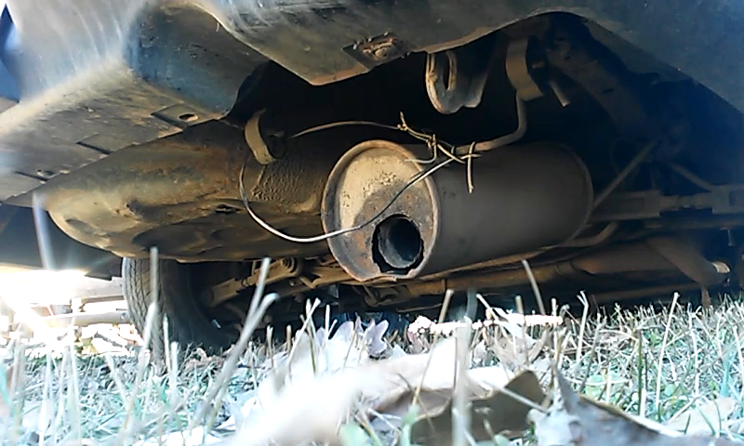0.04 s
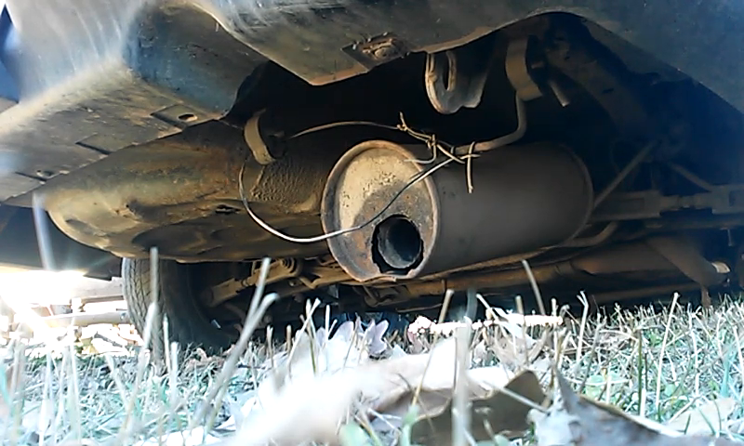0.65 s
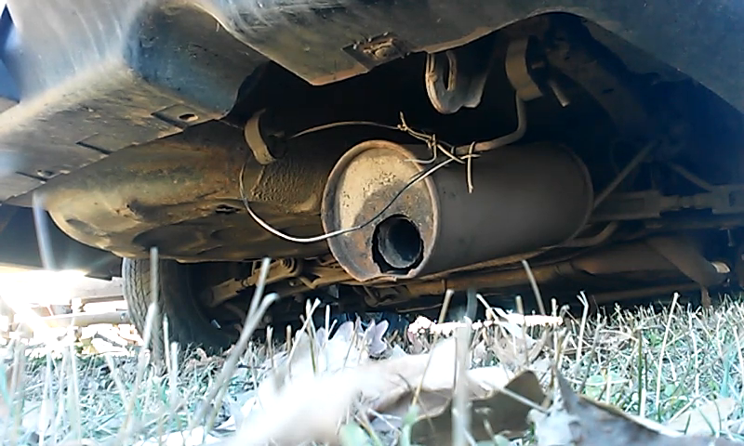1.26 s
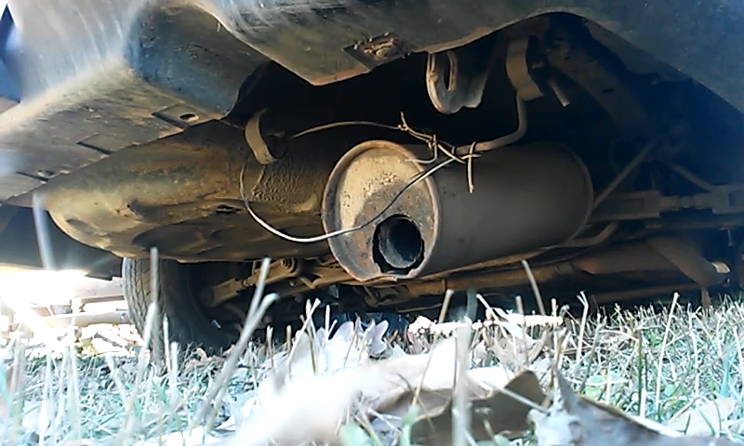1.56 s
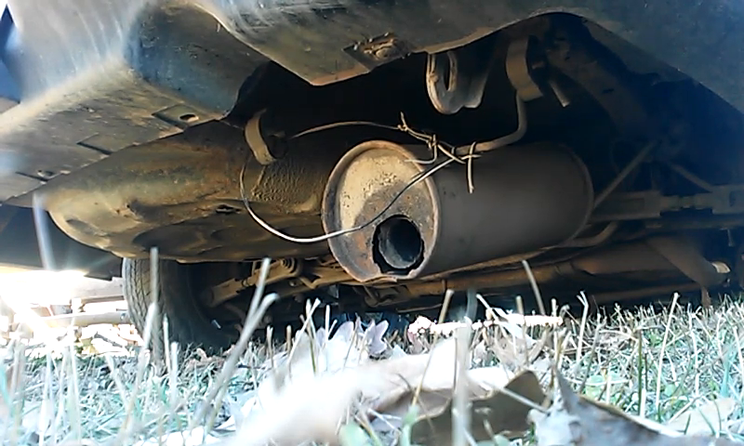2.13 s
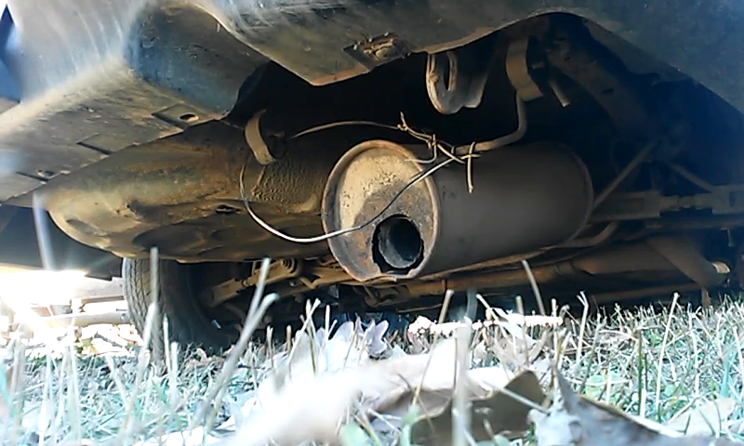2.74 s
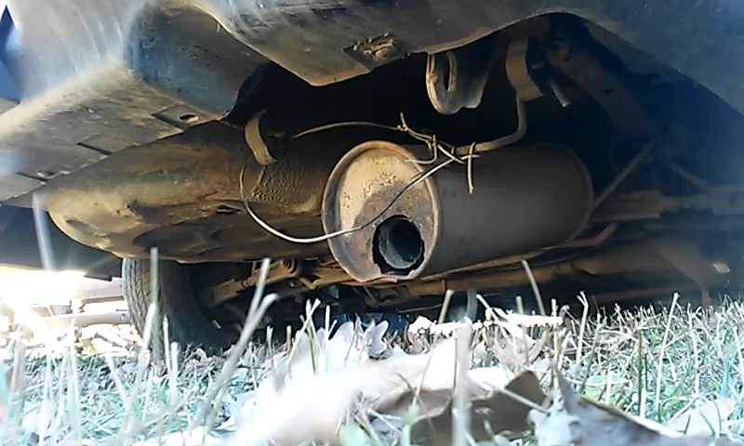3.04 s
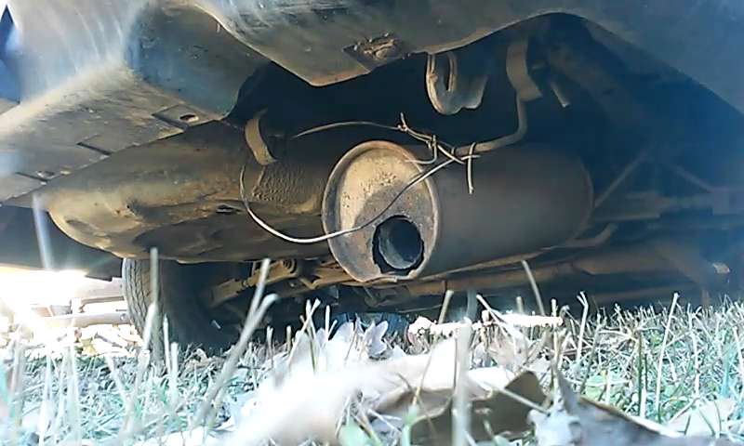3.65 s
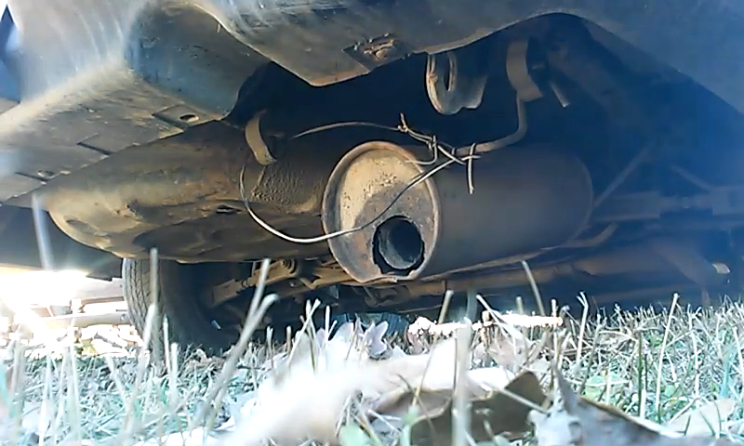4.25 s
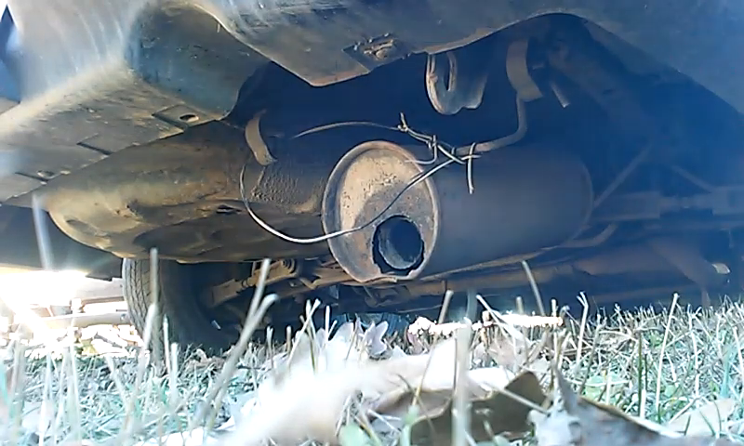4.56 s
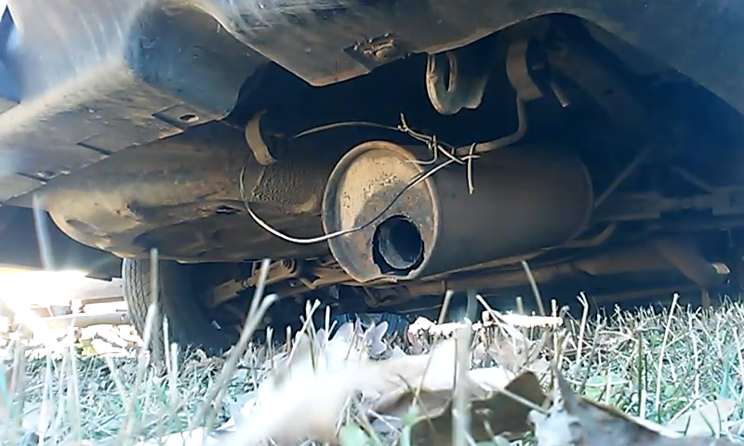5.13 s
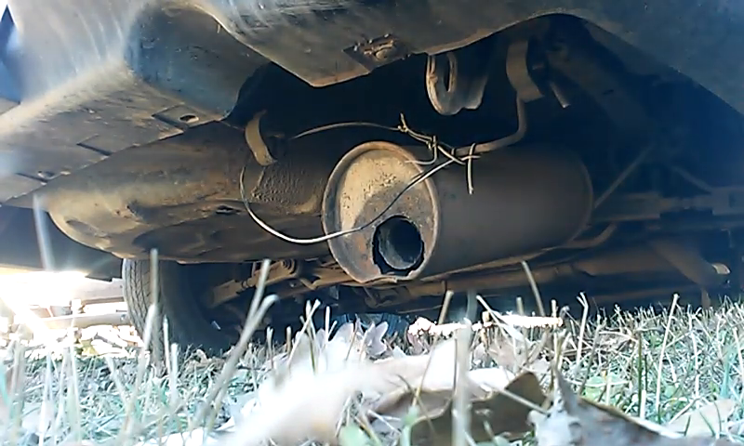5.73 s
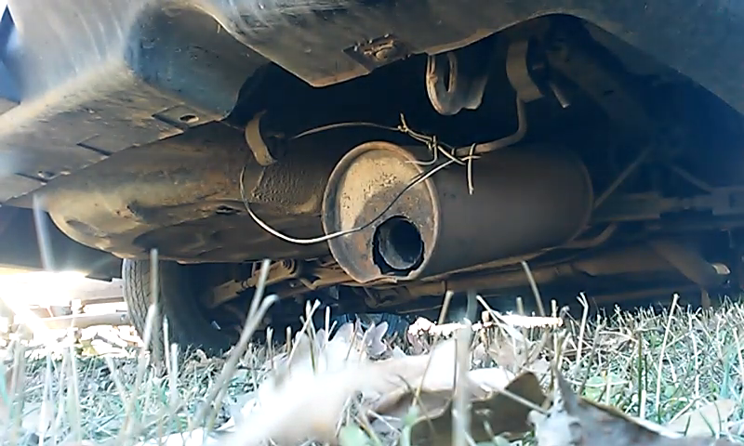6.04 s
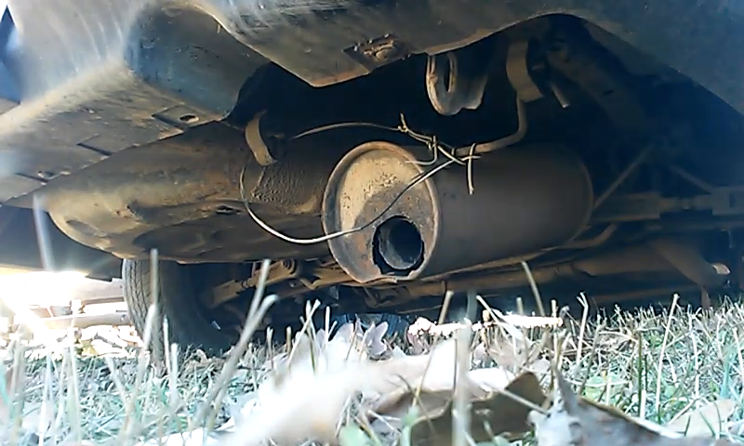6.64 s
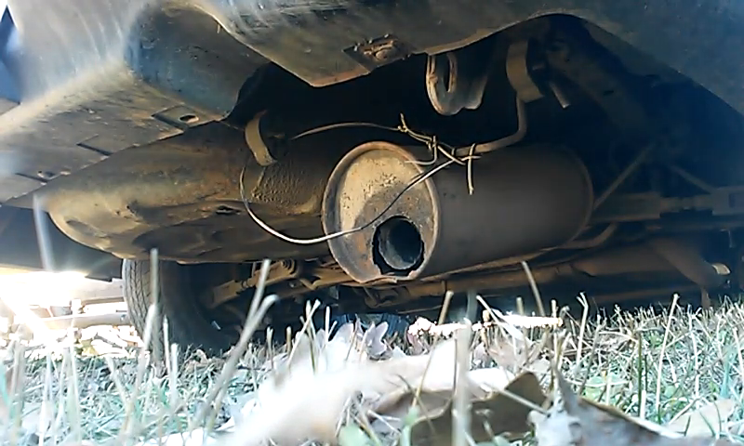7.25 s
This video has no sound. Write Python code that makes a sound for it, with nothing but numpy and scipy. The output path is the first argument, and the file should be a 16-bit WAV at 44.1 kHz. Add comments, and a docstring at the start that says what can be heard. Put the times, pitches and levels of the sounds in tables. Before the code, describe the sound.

After a few dull bumps, a car cranks, fires with a volley of exhaust bangs and drops to a throbbing idle.

```python
"""Cold start of an old car

Outdoors, microphone in the grass just behind the rusty silencer of a four-cylinder car. A scuff and
a few dull bumps of the body, then the starter grinds against the compressions. The engine catches
with a volley of bangs in the pipe, flares, coughs once and sinks to a lumpy idle: unequal cylinders
pulse into the ringing exhaust, and leaking gas hisses in a pattern that repeats each cycle."""
import sys
import numpy as np
from scipy import signal
from scipy.fft import rfft, irfft, next_fast_len
from scipy.io import wavfile
from scipy.ndimage import uniform_filter1d, minimum_filter1d

SR = 44100
rng = np.random.default_rng(int(sys.argv[2]) if len(sys.argv) > 2 else 0)


def unload_audio(sound):
    """Save the sound as a 16-bit wav file, at the path given as the first command line argument."""
    columns = np.transpose(np.atleast_2d(sound))
    # keep every value between -1 and 1, then stretch to whole-number steps
    steps = np.round(np.clip(columns, -1, 1) * 32767)
    wavfile.write(sys.argv[1], SR, steps.astype(np.int16))


N = 321489
TIME = np.arange(N) / SR
FIRST_FIRING_S, RUNS_FROM_S = 2.897, 3.335


def undb(db):
    """Decibels to amplitude."""
    return 10 ** (np.asarray(db) / 20)


def unit(x):
    """Scale to rms 1."""
    return x / np.sqrt(np.mean(x ** 2))


def steady(envelope, seconds=0.11):
    """Scale an envelope so that its running rms is 1."""
    return envelope / np.sqrt(uniform_filter1d(envelope ** 2, int(seconds * SR)))


def between(start, stop, fade=0.0018):
    """A gate with soft edges."""
    return np.clip((TIME - start) / fade, 0, 1) * np.clip((stop - TIME) / fade, 0, 1)


def shape(x, response):
    """Filter by a function of frequency."""
    size = next_fast_len(N + SR // 2)
    return irfft(rfft(x, size) * response(np.fft.rfftfreq(size, 1 / SR) + 1e-3), size)[:N]


def noise(colour):
    """Noise of rms 1, coloured by rows of (frequency [Hz], level [dB])."""
    hz, db = np.transpose(colour)
    white = rng.standard_normal(N)
    return unit(shape(white, lambda f: undb(np.interp(np.log(f), np.log(hz), db, left=-120, right=-120))))


def flicker(rate, db):
    """A gain that wanders at random."""
    knots = np.arange(0, N / SR + 1, 1 / rate)
    return undb(db * np.interp(TIME, knots, rng.standard_normal(len(knots))))


def swell(s, db, rise, fall):
    """An envelope that grows to a peak and dies away, both at a steady rate in dB per second."""
    return undb(db - rise * np.maximum(s - TIME, 0) - fall * np.maximum(TIME - s, 0))


def decays(times, dbs, t60s, rise=0.0015):
    """Envelope of blows that each rise quickly and die away; their powers add."""
    power = np.zeros(N)
    for s, db, t60 in np.broadcast(times, dbs, t60s):
        start = int(s * SR)
        age = TIME[:min(SR, N - start)]
        blow = undb(db - 60 * age / max(t60, .005)) * (1 - np.exp(-age / rise))
        power[start:start + len(age)] += blow ** 2
    return np.sqrt(power)


def pulses(times, sizes):
    """Clicks, each shared between two samples."""
    index, part = np.divmod(np.asarray(times) * SR, 1)
    index = index.astype(int)
    return np.bincount(np.r_[index, index + 1], np.r_[sizes * (1 - part), sizes * part], N)[:N]


def air(level_db=-60):
    """Faint outdoor air, wavering slightly."""
    # open-air spectrum (frequency [Hz], level [dB])
    colour = [(29, -54), (50, -25.5), (91, -19.5), (162, -0.5), (317, -2.5), (565, -1), (701, -7), (753, 4),
              (809, -11), (1160, -13), (1340, -15), (8710, -22.5), (15500, -21.5)]
    return noise(colour) * undb(level_db) * flicker(7.8, 1.3)


def grass(rustle_db=-53, rustle_fade_db_per_s=28, tail_db=-19, tail_t60=0.59):
    """Near the microphone: a scuff on dry grass, stalks springing back, and scattered dry ticks."""
    # the scuff (peak time [s], level [dB], rise [dB/s], fall [dB/s])
    scuff_swell = (0.2, -31.5, 239, 315)
    # dry ticks (time [s], level [dB], ring time [s])
    tick_events = [(0.533, -42, 0.058), (0.6754, -50, 0.024), (0.787, -53, 0.24), (1.216, -54.5, 0.14),
                   (1.249, -47.5, 0.04), (1.971, -40.5, 0.036), (2.138, -36, 0.029), (2.367, -38, 0.063)]
    # scuff and tick spectra (frequency [Hz], level [dB])
    scuff_colour = [(88, -45), (150, -10), (193, -2), (274, -9), (346, 4), (618, 4), (985, 0), (1290, -0.5),
                    (5230, -3), (7270, -14), (15500, -21)]
    tick_colour = [(1350, -30), (2300, -1), (4220, -2.5), (4790, 2.5), (6090, 5), (8940, -5), (12000, -7),
                   (15500, -12)]
    rustle = swell(scuff_swell[0], rustle_db, 140, rustle_fade_db_per_s) * between(0, 0.61)
    scuff = unit(noise(scuff_colour) * flicker(400, 2.13)) * np.hypot(swell(*scuff_swell), rustle)
    s, tick_db, t60 = np.transpose(tick_events)
    ticks = decays(s, tick_db, t60, rise=0.000095) + decays(s, tick_db + tail_db, tail_t60)
    return scuff + noise(tick_colour) * ticks * flicker(500, 3.9)


def bumps(boom_t60=0.24, knock_t60=0.23, rock_db=-10, rock_t60=0.57):
    """The body of the car booms and knocks as it takes weight, then rocks on more softly."""
    # bumps of the body (time [s], boom [dB], knock [dB])
    blows = [(0.287, -29.5, -34.5), (0.489, -50, -48), (0.534, -52, -50), (0.746, -30, -58),
             (0.765, -33, -39.5), (0.901, -35.5, -33.5), (0.988, -42, -59), (1.345, -53, -65),
             (1.456, -57, -48.5)]
    # boom and knock spectra (frequency [Hz], level [dB])
    boom_colour = [(35, -60), (60, -36), (125, -3.5), (205, 6.5), (243, 5), (269, -34), (335, -6),
                   (450, -36), (580, -46), (990, -120)]
    knock_colour = [(180, -35), (300, 3), (796, -6), (1200, -18), (1300, -20), (1550, -37), (2500, -28),
                    (3250, -67), (5500, -120)]
    s, boom_db, knock_db = np.transpose(blows)
    boom = np.hypot(decays(s, boom_db, boom_t60, rise=0.0043),
                    decays(s, boom_db + rock_db, rock_t60, rise=0.027))
    knock = np.hypot(decays(s, knock_db, knock_t60, rise=0.005),
                     decays(s, knock_db + rock_db, rock_t60, rise=0.025))
    return noise(boom_colour) * boom + noise(knock_colour) * knock


def starter(on_s=1.752, off_s=2.93, teeth=62, swing=0.156, gear_db=-35, whine_db=-36.5, brush_db=-59.5,
            chug_db=3.5, chug_db_per_s=1.6, ease_db_per_s=2.5, clunk_db=-17):
    """The pinion slams in and grinds on the ring gear, slowed by each compression; the pipe puffs."""
    # compression strokes while cranking (time [s], puff [dB])
    strokes = [(1.787, -32.5), (1.957, -27.5), (2.158, -30), (2.308, -37), (2.44, -34.5), (2.566, -35),
               (2.695, -37.5), (2.816, -36)]
    # gear, motor brush and pinion clunk spectra (frequency [Hz], level [dB])
    gear_colour = [(150, -25), (250, -7.5), (270, -29.5), (316, 0.5), (396, 0.5), (437, 4), (575, -6.5),
                   (640, 1), (843, -7.5), (1350, -5.5), (1880, -19), (2060, -38.5), (2600, -42),
                   (3380, -67), (5720, -120)]
    brush_colour = [(1290, -32.5), (2200, -3), (3060, -5), (3310, -14), (3800, 0), (4420, -11), (4570, 0.5),
                    (4990, -7), (5680, 0.5), (7460, -20), (15000, -13.5)]
    clunk_colour = [(88, -38), (150, -30), (362, 9.5), (485, -12), (1280, -4.5), (2480, -26), (2820, -27),
                    (3450, -36), (3850, -32), (5760, -22.5), (6920, -39), (12000, -56), (15600, -85),
                    (22000, -120)]
    s, puff_db = np.transpose(strokes)
    stroke = np.interp(TIME, np.r_[s, 2 * s[-1] - s[-2]], np.arange(len(s) + 1))
    age = np.clip(TIME - on_s, 0, off_s - on_s)
    mesh_hz = teeth * np.interp(TIME, s, 1 / np.gradient(s)) * (1 - swing * np.sin(2 * np.pi * stroke))
    mesh = 2 * np.pi * np.cumsum(mesh_hz * flicker(90, 0.165)) / SR
    # tooth rate, its overtones, and the reduction gear in between
    whine = sum(undb(db) * flicker(45, 4) * np.sin(k * mesh / 2)
                for k, db in enumerate((12, 10.5, 4.5, 8, -8), start=2))
    grind = noise(gear_colour) * flicker(140, 1.3)
    # the teeth bite hardest at the top of each compression; as the engine loosens they rest more between
    bite_db = (chug_db + chug_db_per_s * age) * np.cos(2 * np.pi * (stroke + 0.0076)) - ease_db_per_s * age
    spin_up = 1 - np.exp(-age / 0.018)
    gears = spin_up * undb(bite_db) * (undb(gear_db) * unit(grind) + undb(whine_db) * unit(whine))
    # the brushes hiss as the motor draws current on the way up
    brushes = undb(brush_db + 3 * np.cos(2 * np.pi * (stroke + 0.12))) * noise(brush_colour)
    puffs = noise([(52, -25), (75, -2.5), (200, -1.5), (280, -7.5)]) * decays(s, puff_db, 0.33, rise=0.0024)
    clunk = noise(clunk_colour) * decays(s[:1], clunk_db, 0.12, rise=0.0013)
    return between(on_s, off_s) * (gears + brushes) + puffs + clunk


def crankshaft(idle_hz=8.4, flare_hz=15.4):
    """Cycles turned, and load from about 0 at idle to 1 in the flare."""
    # engine speed (time [s], four-stroke cycle rate [Hz])
    speed = [(2.9, 4.629), (3.02, 9.268), (3.12, 12.889), (3.25, 14.241), (3.41, 15.461), (3.55, 15.613),
             (3.78, 15.344), (4.12, 14.3), (4.63, 10.805), (4.94, 9.447), (5.23, 8.756), (5.5, 8.443),
             (5.94, 8.395), (6.73, 9.394), (7.02, 9.355), (7.3, 9.6)]
    hz = np.interp(TIME, *np.transpose(speed))
    turn = np.cumsum(hz) / SR
    turn += 1 / 4 - np.interp(FIRST_FIRING_S, TIME, turn)  # the second cylinder fires first
    return turn, (hz - idle_hz) / (flare_hz - idle_hz)


def valve(x, corner_hz):
    """A valve takes a moment to open, which rounds each pulse."""
    return shape(x, lambda f: np.exp(-(f / corner_hz) ** 2 / 2))


def pipe(x, damping=0.89, echo=0.27, echo_ms=21.4, low_hz=58):
    """Standing waves of alternating sign, one trip up the pipe and back, a mouth with no deep bass."""
    # pipe and silencer resonances (frequency [Hz], width before damping [Hz], level [dB])
    resonances = [(75.4, 12, -6.5), (115.2, 46, -7), (187.5, 25.9, 7), (227.6, 29.8, 3.5), (351.7, 32, -6),
                  (456, 64, -12), (588.7, 30, -11.5), (887, 17, -18)]

    def response(f):
        modes = sum((-1) ** k * undb(db) / (1 + 1j * (f * f - hz * hz) / (f * width * damping))
                    for k, (hz, width, db) in enumerate(resonances))
        round_trip = 1 + echo * np.exp(-2j * np.pi * f * echo_ms / 1000)
        s = 1j * f / low_hz
        return modes * round_trip * s * s / (s * s + s + 1)
    return shape(x, response)


def baffles(x, bounce=0.44, chambers_ms=(4.654, 7.3)):
    """Sound bounces between the plates of two silencer chambers, smearing each pulse but not its colour."""
    def response(f):
        a, b = (np.exp(-2j * np.pi * f * ms / 1000) for ms in chambers_ms)
        return (a - bounce) / (1 - bounce * a) / a * (b - bounce) / (1 - bounce * b) / b
    return shape(x, response)


def running_level(load, idle_db, flare_db, settle_db_per_s):
    """A gain that grows with load and sinks as the engine settles."""
    return undb(idle_db + flare_db * load - settle_db_per_s * (TIME - RUNS_FROM_S))


def loose_metal(turn, tick_db=-59):
    """Loose metal ticks faintly, four times a cycle."""
    beats = np.interp(np.arange(1, turn[-1], 1 / 4) + 0.092, turn, TIME)
    ticks = decays(beats, tick_db + 4 * rng.standard_normal(len(beats)), 0.028, rise=0.00025)
    return ticks * noise([(4500, -1.5), (5400, 0.5), (7000, 3.5), (10500, -11), (12200, 5),
                          (13500, -6), (15500, -9.5)])


def gas(turn, load, whistle_db=-2, whistle_hz=5360):
    """Gusts of turbulent gas follow the cycle: they roar, hiss, and whistle through a narrow gap."""
    # gusts (place [cycles], half length [cycles], roar [dB], hiss [dB], hiss change in the flare [dB])
    gusts = [(0.158, 0.047, -8, -4, -11), (0.458, 0.11, -4.5, -3, -2.5), (.62, .055, -0.5, -3.5, -8),
             (.74, .04, -15.5, -4.5, -5.5), (.93, 0.12, -7, -11.5, -3)]
    # roar and hiss spectra (frequency [Hz], level [dB])
    roar_colour = [(400, -7), (700, 6), (820, -8), (900, -2.5), (1000, -1), (1170, 1.5), (1450, -10.5),
                   (1750, -7), (2000, -15), (2380, -17.5), (2490, -11.5), (2620, -20.5), (2770, -18),
                   (3600, -41)]
    hiss_colour = [(1900, -19), (2800, -9), (3300, -5.5), (4000, -3.5), (4800, -2), (5900, -4.5),
                   (7100, -14), (9900, -22), (11300, -23), (12200, -18), (13100, -26), (15500, -30.5)]
    roar_flow, hiss_flow = .17, .1  # the floor between gusts
    for place, length, roar_db, hiss_db, flare_db in gusts:
        gust = np.exp(-(((turn - place + .5) % 1 - .5) / length) ** 2)
        roar_flow += gust * undb(roar_db)
        hiss_flow += gust * undb(hiss_db + flare_db * load)
    whistle = noise([(whistle_hz - 750, -30), (whistle_hz, 0), (whistle_hz + 750, -30)])
    roar = steady(roar_flow * flicker(230, 1.7) * flicker(25, 2.7)) * noise(roar_colour)
    whistle *= steady(hiss_flow ** 2 * flicker(40, 3.7), seconds=0.46)  # the strongest gusts make it sing
    hiss = steady(hiss_flow * flicker(160, 4.5)) * noise(hiss_colour) + undb(whistle_db) * whistle
    return roar * running_level(load, -36, 3, 0.82) + hiss * running_level(load, -53, 2.5, 1)


def cough():
    """A late burn barks once in the pipe as the revs start to sink."""
    # the bark (peak time [s], level [dB], rise [dB/s], fall [dB/s])
    bark = (3.802, -25, 330, 400)
    return noise([(400, -10), (600, 0), (770, -1), (950, -9), (1700, -18), (2200, -30)]) * swell(*bark)


def catching(turn, thud_peak_db=4, shove_db=-28, crack_db=6, snap_db=8, muffle_hz=7000,
             thud_rise_db_per_s=8, crack_fade_db_per_s=144, blast_fade_db_per_s=46):
    """Each first firing thuds in the pipe, shoves and blasts gas; fuel cracks until it burns clean."""
    # cold cylinders in firing order (thud [dB], crack [dB], gas blast [dB], time to burn clean [s])
    cylinders = [(3, -10, -23.5, 0.3), (-2.5, -8.5, -32, .13), (1.5, -8.5, -23.5, 0.29),
                 (0.5, -11, -29.5, 0.17)]
    # fuel crack and gas blast spectra (frequency [Hz], level [dB])
    crack_colour = [(150, -21), (250, 1.5), (298, -14), (367, 0), (507, -27), (611, -13), (670, -24),
                    (885, -20), (983, -23.5), (1700, -29.5), (4000, -63), (5200, -78.5), (8800, -120)]
    blast_colour = [(1650, -25), (2800, -1.5), (3600, -5), (5410, -2), (7700, -24), (10000, -34),
                    (12200, -33), (15500, -37)]
    count = len(cylinders)
    firing = np.arange(1, count * np.interp(RUNS_FROM_S, TIME, turn)).astype(int)
    s = np.interp(firing / count, turn, TIME)
    age = s - FIRST_FIRING_S
    push_db, burn_db, gas_db, clean_s = np.array(cylinders)[firing % count].T
    pushes = valve(pulses(s, undb(push_db + thud_rise_db_per_s * age)), corner_hz=740)
    thuds = pipe(pushes, damping=2.03, echo=0.47, low_hz=61)
    thuds *= undb(thud_peak_db) / np.abs(thuds).max()
    slow_db = 20 * np.log10(np.gradient(s) / np.gradient(s).min())  # slow strokes move the most gas
    shoves = noise([(30, -27), (60, -11.5), (90, 10.5), (150, -3.5)]) * decays(s, shove_db + slow_db, 0.72)
    burn_db = burn_db - 6.5 * np.exp(-age / 0.092)  # the early burns are feeble
    fade_db = crack_fade_db_per_s * np.maximum(age - clean_s, 0)
    burns = decays(s, burn_db - fade_db + crack_db, 0.12, rise=0.00056)
    # a short snap opens each crack, and fades more slowly as the burn clears
    snaps = decays(s, burn_db - 0.71 * fade_db + snap_db, 0.0096, rise=0.0001)
    cracks = noise(crack_colour) * (burns + snaps)
    cracks = shape(cracks, lambda f: 1 / (1 + 1j * f / muffle_hz) ** 2)  # the silencer dulls them
    blasts = noise(blast_colour) * decays(s, gas_db - blast_fade_db_per_s * age, 0.11, rise=0.0013)
    return thuds + shoves + cracks + blasts


def throb(turn, load, scatter_db=1.4, jitter_s=.00004, suck=0.34, valve_open_cycles=.164):
    """Four unequal cylinders pulse through the pipe and silencer, just ahead of the microphone."""
    # exhaust pulses (place [cycles], header delay [ms], size at idle [ratio], size in the flare [ratio])
    cylinders = [(0.036, 1.52, 0.56, 0.96), (.3, 2.95, 0.51, 0.46), (.608, 2.78, .25, 1.09),
                 (0.781, 1.912, 0.66, 1.04)]
    cycles, flow = np.arange(int(turn[-1]) + 1), 0
    for place, delay_ms, idle, flare in cylinders:
        timing, strength = rng.standard_normal((len(cycles), 2)).T
        # the valve opens with a push; the gas column overshoots and sucks back
        for angle, sign in ((place, 1), (place + valve_open_cycles, -suck)):
            s = np.interp(cycles + angle, turn, TIME) + delay_ms / 1000 + jitter_s * timing
            size = (idle + (flare - idle) * np.interp(s, TIME, load)) * undb(scatter_db * strength)
            flow += pulses(s, sign * size * (s > RUNS_FROM_S) * (s < TIME[-1]))
    # faster running steepens the pulses: less deep bass, more of the pipe's upper bark
    drive = np.clip(load, 0, 1)
    flow = valve(flow, corner_hz=502) / (1 + drive)
    steepening = shape(flow, lambda f: .7 * np.exp(-((f - 360) / 70) ** 2) - .61 * np.exp(-(f / 135) ** 4))
    exhaust = baffles(pipe(flow + drive * steepening))
    exhaust /= np.std(exhaust[TIME > RUNS_FROM_S])
    return exhaust * running_level(load, idle_db=-9.5, flare_db=2, settle_db_per_s=.05)


def scene():
    """The car and the grass over faint outdoor air, in mono."""
    turn, load = crankshaft()
    running = between(RUNS_FROM_S - .03, 9, fade=0.021)
    engine = throb(turn, load) + running * (gas(turn, load) + loose_metal(turn))
    return (engine + catching(turn) + cough() + starter() + bumps() + grass() + air())[None]


def record(dry, ceiling=.97, look_s=.002, top_hz=15900):
    """A limiter behind the microphone ducks the loudest peaks; the top treble is cut."""
    span = int(look_s * SR)
    headroom = np.minimum(1, ceiling / (np.abs(dry) + 1e-9))
    gain = uniform_filter1d(minimum_filter1d(headroom, 2 * span + 1), span)
    return signal.sosfilt(signal.ellip(8, .2, 70, top_hz, fs=SR, output="sos"), dry * gain)


dry = scene()
out = record(dry)
unload_audio(out)
```